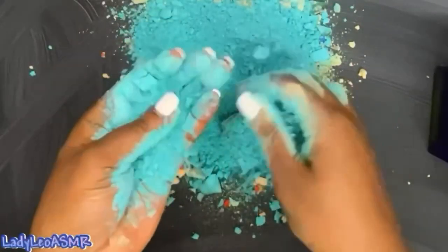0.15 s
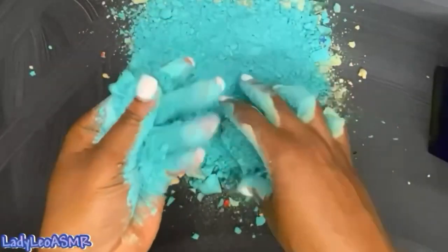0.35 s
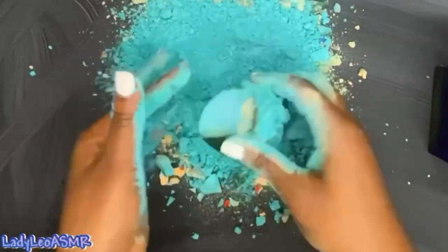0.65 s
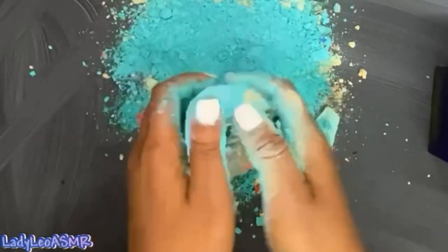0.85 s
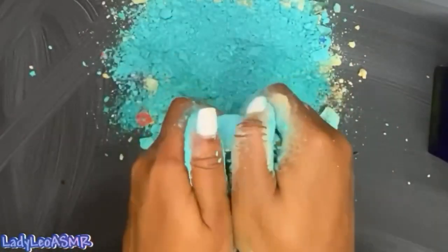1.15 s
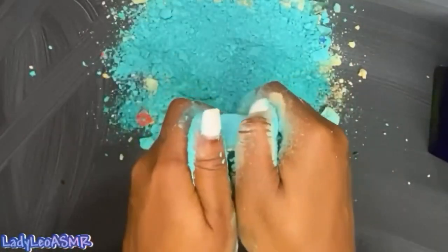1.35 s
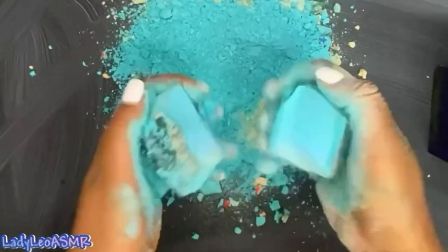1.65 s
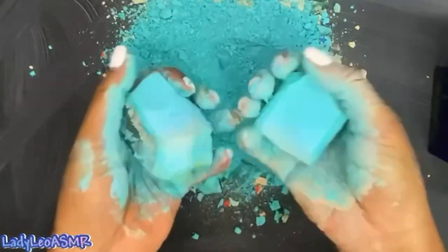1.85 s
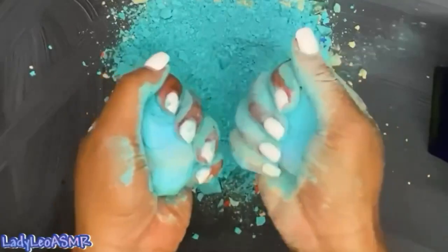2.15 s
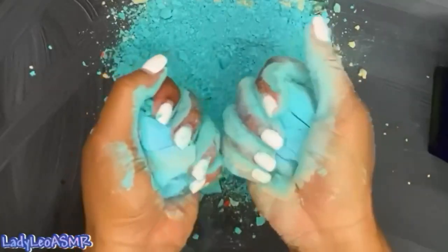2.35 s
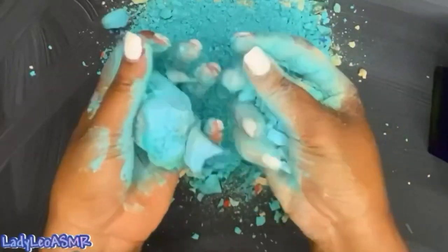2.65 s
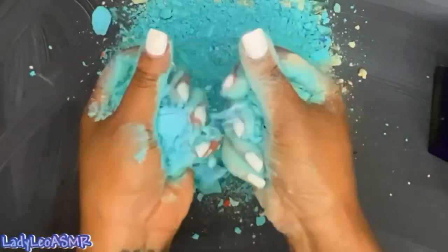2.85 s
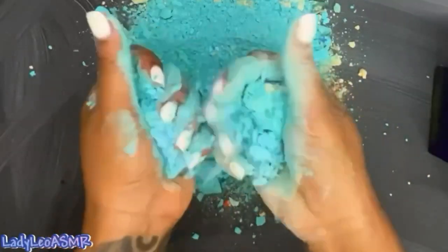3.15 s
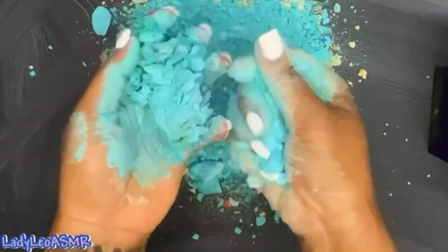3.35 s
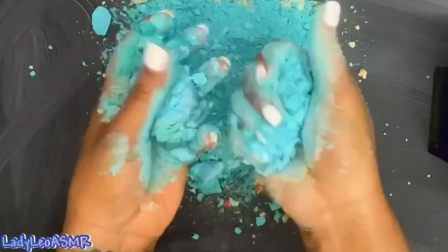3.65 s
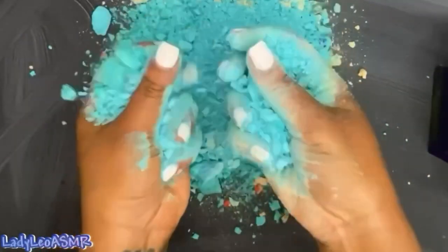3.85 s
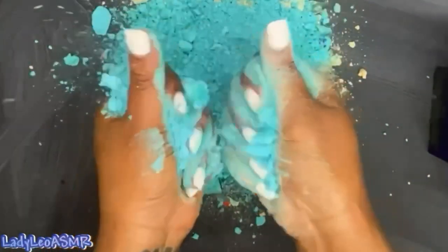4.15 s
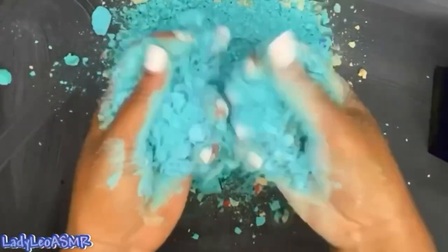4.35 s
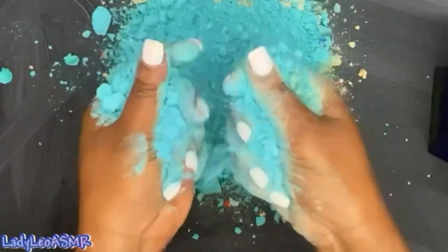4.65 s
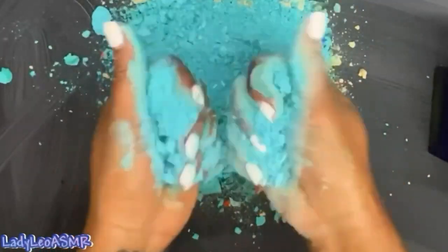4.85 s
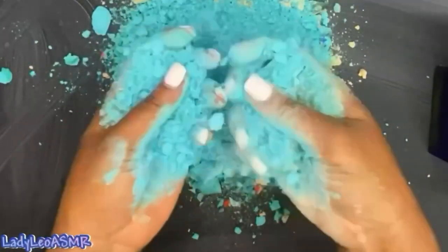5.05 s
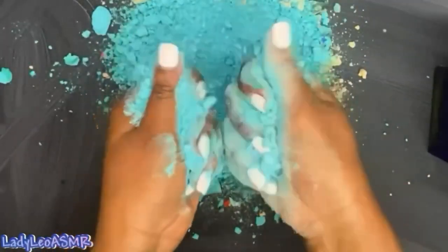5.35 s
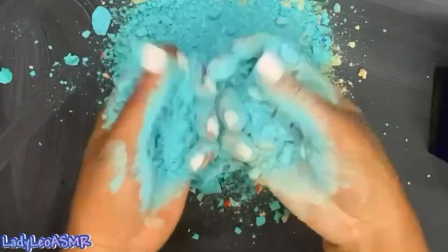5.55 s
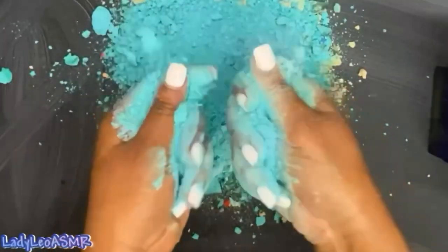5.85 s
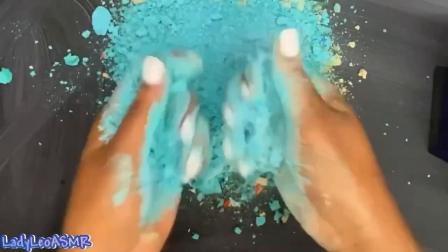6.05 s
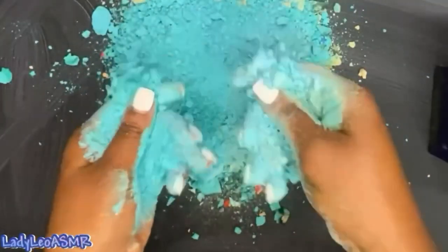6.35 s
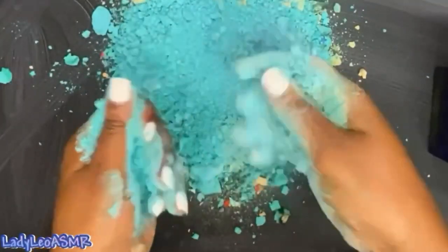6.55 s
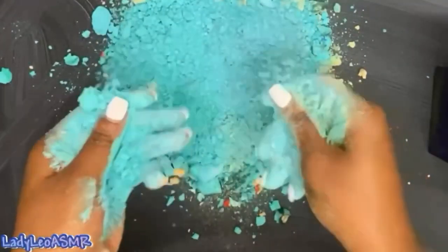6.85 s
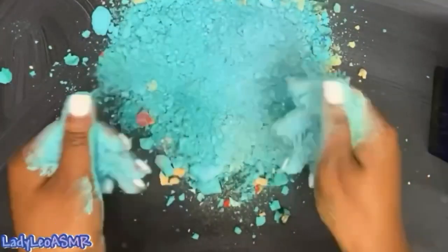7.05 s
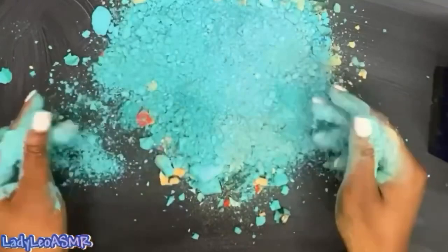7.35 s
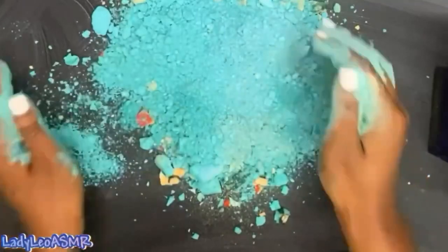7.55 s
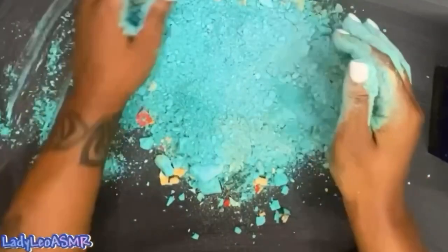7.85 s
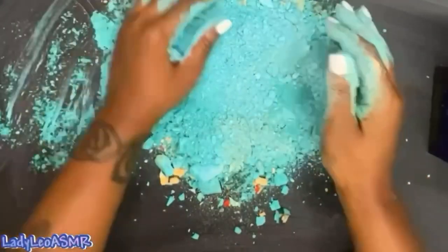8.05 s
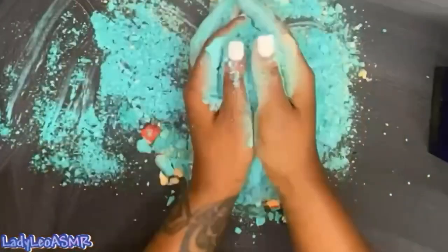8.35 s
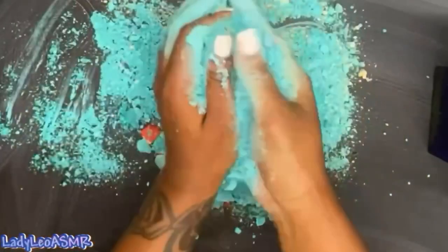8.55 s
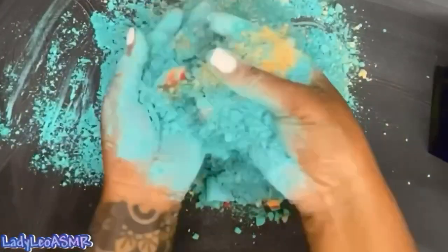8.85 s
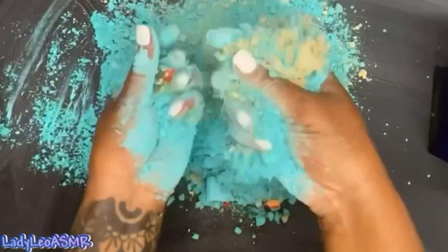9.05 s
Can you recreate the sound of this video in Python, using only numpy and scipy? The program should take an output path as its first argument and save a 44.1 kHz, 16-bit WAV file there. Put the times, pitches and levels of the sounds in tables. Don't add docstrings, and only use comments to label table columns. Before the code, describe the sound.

Close, dry chalk crushing: soft powdery rustle, a hard thump, crisp snaps and crunches, gritty kneading, then broad palm strokes scraping the heap.

```python
import sys
import numpy as np
from scipy import signal
from scipy.fft import rfft, irfft, next_fast_len
from scipy.io import wavfile
from scipy.ndimage import uniform_filter1d

SR = 44100
rng = np.random.default_rng(int(sys.argv[2]) if len(sys.argv) > 2 else 0)


def to_wav(sig):
    pcm = np.clip(np.atleast_2d(sig), -1, 1) * 32767
    pcm = np.round(pcm).astype(np.int16)
    wavfile.write(sys.argv[1], SR, pcm.T)


def gain_from_db(level_db):
    decades = np.asarray(level_db, float) / 20
    return 10 ** decades


N = 406161
OPPOSITE = np.array([[1], [-1]])


def unit(x):
    return x / np.sqrt(np.mean(x ** 2))


def ring(x, hz, width_hz):
    return signal.lfilter(*signal.iirpeak(min(hz, 0.4 * SR), hz / width_hz, fs=SR), x)


def band(x, lo_hz, hi_hz):
    return signal.sosfilt(signal.butter(3, [lo_hz, hi_hz], "band", fs=SR, output="sos"), x)


def walk(rate_hz):
    hold = int(SR / rate_hz)
    steps = np.repeat(rng.standard_normal(N // hold + 1), hold)
    return 1.84 * uniform_filter1d(steps, hold)[:N]


def bump(t, middle_s, length_s):
    return np.cos(np.pi * np.clip((t - middle_s) / length_s, -0.5, 0.5))


def add(out, start_s, sound, peak_db, pan_db):
    i = int(start_s * SR)
    sound = sound[:, :N - i] / np.abs(sound).max()
    port_db = peak_db + pan_db * OPPOSITE / 2
    out[:, i:i + sound.shape[1]] += sound * gain_from_db(port_db)


# rise in s, fall in s, after-sound in dB, its t60 in s,
# share of it that differs between the ports.
BREAK_TAILS = [
    (0.00447, 0.0118, -8, 0.52, .3),
    (0.0007, 0.0025, -11, 0.32, 1),
    (0.00073, 0.0014, -11, 0.23, 0.91),
    (0.00066, 0.0012, -11.5, 0.19, 0.55),
    (0.00043, 0.00024, -8, 0.022, 0.8),
]
FIRST_CRACK = 1.2
PATTER_DB = 2.5


def burst(noise, rise_s, fall_s, after_db, t60_s, own, clean=1):
    t = np.arange(noise.shape[1]) / SR
    swell = t ** 2 / (rise_s ** 2 + t ** 2)
    push = swell * np.exp(-t / fall_s)
    push = push / push.max()
    at_peak = np.arange(len(t)) == push.argmax()
    crack = at_peak * np.sqrt(np.sum(push ** 2)) * np.sign(noise[0, 0])
    held = noise[0, (t / (2 * fall_s)).astype(int)]
    patter = gain_from_db(PATTER_DB * np.tanh(held))
    after = gain_from_db(after_db) * swell * np.exp(-np.log(1000) * t / t60_s) * patter
    echoes = after * (noise[1] + own * noise[2] * OPPOSITE)
    return noise[0] * push + clean * FIRST_CRACK * crack + echoes


COARSE_DB = [23, 11.5, 3, -1, -2.5]
FAMILY_DB = [-12.5, -6, -3, -2, -2]
# t60 in s after letting go; coarse grains stop first, dust trickles on.
LET_GO_T60_S = [0.2, 0.39, 0.63, 0.8, 0.88]
CLOSE_S, SLIDE_IN_S = 0.0024, 0.025
BUILD_UP = 0.05


def handling(strokes, close_s):
    t = np.arange(N) / SR
    out = np.zeros((len(FAMILY_DB), N))
    t60_s = np.array(LET_GO_T60_S)[:, None]
    for start_s, hold_s, force_db, coarse in strokes:
        part = slice(int(start_s * SR), int((start_s + hold_s + t60_s.max()) * SR))
        since_s = t[part] - start_s
        grip = np.clip(since_s / (close_s + BUILD_UP * hold_s), 0, 1)
        let_go = gain_from_db(-60 * np.maximum(since_s - hold_s, 0) / t60_s)
        level_db = force_db + np.array(FAMILY_DB) + coarse * np.array(COARSE_DB)
        out[:, part] += (grip * let_go * gain_from_db(level_db)[:, None]) ** 2
    return out


# start in s, hold in s, force in dB,
# coarseness (-1 powder, +1 lumps).
SQUEEZES = [(0.0, 0.005, -51.5, 0), (0.17, 0.1, -51, -0.56), (0.45, 0.092, -57, -1),
            (0.66, 0.014, -55.5, 0), (0.7, 0.013, -69, -4), (0.8, 0.27, -68.5, -6),
            (0.98, 0.076, -56, -0.6), (1.49, 0.081, -58, 2), (1.65, 0.3, -51, -4), (1.75, 0.092, -59, -0.5),
            (1.93, 0.14, -53.5, -0.5), (2.09, 0.043, -44.5, -0.4), (2.2, 0.14, -54, 0.87),
            (2.348, 0.039, -39, .5), (2.39, 0.07, -45.5, .5), (2.45, 0.14, -46.5, .5),
            (2.6, 0.15, -45.5, 0.69), (2.685, 0.022, -38.5, 0.52), (2.75, .1, -47.5, .5),
            (2.86, 0.028, -43.5, 0.35), (2.88, 0.17, -41.5, 0.15), (3.2, 0.29, -49.5, 0),
            (3.44, 0.037, -44.5, 1.06), (3.73, 0.14, -52.5, 0.5), (3.79, 0.28, -47.5, 0.33),
            (4.21, 0.12, -41, 0.82), (4.47, 0.22, -44, 0.12), (4.64, 0.24, -45.5, 0.23),
            (5.06, .05, -54.5, .2), (5.12, 0.33, -48, 0.32), (5.47, 0.22, -71, -3), (5.655, 0.1, -53, 0),
            (5.74, 0.27, -49, 0.36), (6.08, 0.053, -51.5, 1), (6.24, 0.15, -50, 0.56),
            (6.45, 0.18, -51, 0.17), (6.7, 0.24, -55, -0.05), (6.94, 0.021, -48, 0.5),
            (6.96, .12, -84, 2.5), (7.15, 0.14, -51, -0.1), (8.73, 0.11, -52, 0), (8.85, 1, -51, 0.4),
            (8.91, 0.014, -61, -2), (4.06, 0.16, -45.5, 0.16)]
# start in s, hold in s, force in dB,
# coarseness (-1 powder, +1 lumps).
SWEEPS = [
    (7.565, 0.017, -52.5, 0.63),
    (7.655, 0.077, -37, 0.93),
    (7.73, 0.1, -32.5, 0.83),
    (7.86, 0.096, -39.5, 0.37),
    (7.94, 0.12, -41, 0.93),
    (8.06, 0.1, -41, 1.32),
    (8.17, 0.11, -38, 1),
    (8.29, 0.12, -57.5, 1.85),
    (8.44, 0.3, -47, 0.96),
]
# centre in Hz, width in Hz, grains per s, size spread in dB, trim in dB,
# share that differs between the hands.
GRAINS = [
    (153, 380, 470, -0.5, -6, 0.1),
    (480, 1230, 900, 2, 0, 1),
    (1820, 1770, 1500, 4, 2, 0.87),
    (5720, 3500, 6300, 1.5, 3, 0.37),
    (9280, 7000, 3600, -0.5, 3.5, 0.64),
]
# low and high edge in Hz, steep outside.
FAMILY_EDGES_HZ = [(60, 544), (200, 1530), (600, 4800), (2600, 9500), (5000, 15500)]
STILL_DB = [-61, -64.5, -70, -65.5, -66.5]
SWEEP_UNEVEN = 0.5


def crumbs():
    kneading = handling(SQUEEZES, CLOSE_S)
    sweeping = handling(SWEEPS, SLIDE_IN_S)
    uneven = np.where(sweeping[3] > kneading[3], SWEEP_UNEVEN, 1)
    force = np.sqrt(kneading + sweeping + gain_from_db(STILL_DB)[:, None] ** 2)
    out, grip = 0, walk(25)
    for family, level, edges_hz in zip(GRAINS, force, FAMILY_EDGES_HZ):
        hz, width_hz, rate, spread_db, trim_db, own = family
        hit = rng.random((2, N)) < rate / SR
        size_db = spread_db * uneven * np.minimum(rng.exponential(size=(2, N)), 5.0)
        grains = (hit * gain_from_db(size_db) + 0.38) * rng.standard_normal((2, N))
        both, apart = unit(band(ring(grains, hz, 0.99 * width_hz), *edges_hz))
        gain = level * gain_from_db(trim_db + uneven * (0.92 * grip + 1.72 * walk(60)))
        out = out + gain * (both + own * apart * OPPOSITE)
    return out


# centre in Hz, width in Hz, level in dB.
ROOM_MODES = [(57.9, 11.1, 0.5), (88.6, 13.2, -14), (118.7, 35, -10), (156, 119, -15.5), (41.4, 25, -10)]
# middle in s, length in s, dB over the idle level.
SWELLS = [(0.01, 0.089, 19), (0.297, 0.17, 4.5), (0.546, 0.36, 13), (0.84, 0.38, 11), (1.191, 0.2, 11.5),
          (1.496, 0.44, 7.5), (1.846, 0.32, 8.5), (2.313, 0.28, 11.5), (2.76, 0.55, 7), (3.032, 0.091, 14),
          (3.56, 0.42, 11), (4.195, 0.99, 8), (4.737, 0.67, 7.5), (5.425, 0.74, 10), (5.94, 0.24, 6.5),
          (6.205, 0.3, 6), (6.678, 0.25, 10.5), (7.047, 0.25, 10.5), (7.27, 0.38, 7.5), (7.712, 0.33, 8.5),
          (8.004, 0.34, 10.5), (8.312, 0.46, 12.5), (8.89, 1, 7)]
IDLE_DB = -40
UPPER_RUMBLE_FOLLOWS = 0.27


def rumble():
    t = np.arange(N) / SR
    load_db = IDLE_DB + sum(rise_db * bump(t, s, length_s) for s, length_s, rise_db in SWELLS)
    out = 0
    for hz, width_hz, mode_db in ROOM_MODES:
        noise = rng.standard_normal((2, N))
        both, apart = unit(ring(ring(noise, hz, width_hz), hz, 2 * width_hz))
        share = 1 if hz < 90 else UPPER_RUMBLE_FOLLOWS
        swell_db = np.mean(load_db) + share * (load_db - np.mean(load_db))
        out = out + gain_from_db(swell_db + mode_db) * (both + hz / 500 * apart * OPPOSITE)
    return band(out, 18, 300)


HISS_DB = -69.5


def air():
    both, apart = unit(band(rng.standard_normal((2, N)), 2500, 12000))
    return gain_from_db(HISS_DB) * (both + 0.6 * apart * OPPOSITE)


# start in s, ring in Hz, dull body peak in dB, crunch peak in dB.
ROLLING_KNOCKS = [(0.001, 570, -27, -37), (0.316, 563, -33, -56), (0.047, 700, -43, -63),
                  (2.355, 1100, -22, -17), (2.372, 1200, -31, -24.5), (4.705, 890, -29, -30),
                  (5.062, 490, -43, -41), (6.848, 1300, -38.5, -38), (6.868, 1300, -52, -42),
                  (7.075, 700, -39, -54.5), (7.575, 480, -35.5, -42), (7.666, 705, -30, -44),
                  (7.733, 334, -23.5, -42), (7.793, 510, -14.5, -43), (7.895, 1200, -19, -40),
                  (8.058, 860, -21.5, -33), (8.087, 480, -19, -40), (8.125, 500, -22, -40),
                  (8.269, 494, -18.5, -38), (8.296, 480, -18, -28), (8.394, 405, -30, -32),
                  (8.507, 503, -26.5, -36), (8.555, 804, -31, -40), (8.591, 400, -41, -44),
                  (8.611, 400, -31, -35), (8.677, 497, -25.5, -33), (8.752, 1300, -31, -46)]
# start in s, ring in Hz, dull body
# peak in dB, crunch peak in dB.
KNOCKS = [(0.2653, 468, -24, -56), (0.4909, 200, -36, -38), (0.705, 197, -39, -32.5),
          (1.487, 800, -9, -19), (1.737, 865, -26, -23.5), (1.8233, 660, -15.5, -17),
          (2.151, 1380, -27, -34.5), (2.191, 1160, -26, -19), (2.219, 1420, -18, -20),
          (2.2374, 1520, -13.5, -15.5), (2.2701, 1120, -17, -19), (2.3027, 965, -31, -16.5),
          (2.5868, 573, -7, -10), (2.602, 670, -23, -24), (2.652, 960, -18.5, -18.5),
          (2.6947, 560, -20, -19.5), (2.7362, 480, -11.5, -22), (2.8931, 302, -22, -16.5),
          (2.9968, 1180, -22.5, -30), (3.0262, 980, -25, -22.5), (3.057, 1350, -48, -15.5),
          (3.1127, 1180, -27, -24.5),
          (3.4762, 975, -19, -17), (3.488, 830, -28, -20), (3.5542, 202, -31, -24),
                 (3.801, 520, -25.5, -14), (3.96, 970, -29, -28.5), (3.995, 565, -10, -12.5),
                 (4.1925, 1468, -20, -19), (4.2016, 1340, -2.5, -3.5), (4.4129, 1390, -23.5, -25),
                 (4.512, 376, -30, -33), (4.5533, 493, -55, -24), (4.6429, 1320, -23.5, -22.5),
                 (4.7195, 935, -27, -32), (4.906, 990, -28, -35), (5.285, 523, -33.5, -27.5),
                 (5.3997, 988, -35, -28.5), (5.7534, 1170, -32, -27), (5.855, 1240, -19, -23.5),
                 (5.8937, 288, -24, -19.5), (6.073, 756, -18.5, -14.5), (6.264, 1380, -31, -25),
                 (6.584, 422, -25.5, -28), (6.7915, 786, -32, -39), (6.946, 790, -36, -40),
                 (7.241, 965, -39, -35), (7.2804, 730, -29.5, -58), (8.4405, 1420, -28, -25.5),
                 (8.6291, 930, -26, -24), (8.7148, 961, -27, -30), (9.0055, 1120, -33.5, -32)]
KNOCK_WIDTH = 0.45
BODY_PAN_DB, CRUNCH_PAN_DB = -1.5, -1.2


def knocks(lumps, clean=1):
    out = np.zeros((2, N))
    for s, hz, body_db, crunch_db in lumps:
        noise, pan = rng.standard_normal((2, 3, 8192)), rng.standard_normal()
        push = burst(noise[0], *BREAK_TAILS[1], clean)
        body = band(ring(push, hz, KNOCK_WIDTH * hz) + 0.47 * push, 275, 1450)
        crunch = band(burst(noise[1], *BREAK_TAILS[2], clean), 1290, 3200)
        add(out, s, body, body_db + 3.5, BODY_PAN_DB * pan)
        add(out, s, crunch, crunch_db + 5.5, CRUNCH_PAN_DB * pan)
    return out


# start in s, peak in dB, pitch in Hz.
THUMPS = [
    (1.489, -11.5, 327),
    (1.829, -21.5, 157),
    (2.903, -15.5, 161),
    (4.198, -61, 100),
    (7.965, -21, 130),
    (0.002, -35.5, 201),
]


def thumps():
    out = np.zeros((2, N))
    for s, peak_db, hz in THUMPS:
        blow = burst(rng.standard_normal((3, 8192)), *BREAK_TAILS[0], clean=0)
        add(out, s, band(blow, 0.13 * hz, 1.41 * hz), peak_db, 0)
    return out


# start in s, peak in dB, pitch in Hz.
POPS = [(0.172, -30, 3520), (0.318, -45, 710), (0.527, -26.5, 740), (2.647, -14, 2000), (3.005, -27, 1160),
        (3.882, -18, 5400), (4.036, -30, 740), (4.289, -9, 885), (4.473, -39, 956), (4.595, -18.5, 5550),
        (4.672, -17.5, 1560), (4.814, -17.5, 920), (4.935, -20, 5180), (5.438, -20.5, 1000),
        (5.463, -28, 705), (5.665, -33.5, 1800), (5.883, -18, 5000), (5.932, -17, 5300), (6.152, -21, 1170),
        (6.306, -22, 920), (6.387, -27, 1150), (6.473, -28, 1030), (6.725, -31, 1320), (6.858, -28, 3860),
        (7.166, -28, 790), (7.35, -25, 775), (8.858, -25.5, 2150), (8.92, -29, 1067), (8.968, -35, 1570),
        (9.196, -19.5, 1350)]
SPLINTER_HZ = [700, 1150, 1800, 2900, 4600, 6200]
SPLINTERS_PER_S, SPLINTER_DB, SPLINTER_SPREAD_DB = 6.6, -2, 1.5


def pops():
    out = np.zeros((2, N))
    for s, peak_db, hz in POPS:
        noise, pan = rng.standard_normal((3, 2048)), rng.standard_normal()
        push = burst(noise, 0.00033, 0.0016, -6.5, 0.15, 0.74)
        pop = ring(push, hz, 0.61 * hz) + 0.089 * band(push, 680, 10300)
        add(out, s, pop, peak_db - 0.5, 2.0 * pan)
    force = np.sqrt(handling(SQUEEZES, CLOSE_S)[2])
    decay = np.exp(-1 / (0.0017 * SR))
    for hz in SPLINTER_HZ:
        hit = rng.random(N) < SPLINTERS_PER_S / SR
        size = gain_from_db(SPLINTER_SPREAD_DB * np.minimum(rng.exponential(size=N), 3.0))
        crack = signal.lfilter([1], [1, -decay], hit * size * force) * rng.standard_normal((2, N))
        both, apart = ring(crack, hz, 0.45 * hz) * gain_from_db(SPLINTER_DB) * np.sqrt(6000 / hz)
        out = out + both + 1.6 * apart * OPPOSITE
    return out


# start in s, peak in dB, top-octave peak in dB.
SNAPS = [(0.2441, -31, -41), (0.7058, -30.5, -35), (0.904, -62, -28.5), (1.487, -19, -18.5),
         (1.499, -20, -16), (1.739, -16, -22), (1.8244, -21, -46), (2.103, -23.5, -25),
         (2.1617, -23.5, -44), (2.1905, -14.5, -13), (2.197, -14.5, -29), (2.2201, -6, -28),
         (2.238, -7, -7.5), (2.248, -16, -30), (2.271, -6.5, -11), (2.294, -20, -18),
         (2.303, -9, -21), (2.333, -18.5, -25), (2.587, -17, -19), (2.653, -22, -20),
         (2.6968, -20.5, -18.5), (2.756, -22.5, -42), (2.8947, -18.5, -17.5), (3.0002, -26, -18),
         (3.058, -12, -14.5), (3.072, -27, -34), (3.0928, -29, -22), (3.1348, -24.5, -57),
         (3.182, -30.5, -32),
         (3.436, -22.5, -29), (3.457, -18, -19), (3.467, -22, -22), (3.4772, -7.5, -7),
                (3.4873, -9, -14), (3.498, -27, -17), (3.556, -20.5, -22), (3.803, -21.5, -25),
                (3.96, -18.5, -48), (3.9995, -18, -15.5), (4.1916, -19.5, -21), (4.202, -13, -18),
                (4.227, -20, -42), (4.2492, -21, -40), (4.5356, -27.5, -53), (4.644, -23.5, -46),
                (4.78, -21.5, -28), (4.9078, -28, -29), (5.061, -30.5, -38), (5.28, -41, -51),
                (5.8562, -24, -23), (5.895, -14, -18), (6.074, -24, -27), (6.545, -29, -19),
                (6.5814, -25.5, -26), (6.7937, -29.5, -30), (8.4383, -8.5, -36), (8.676, -29, -58),
                (8.903, -35, -35), (9.0248, -34.5, -26.5)]
SNAP_PAN_DB, TOP_PAN_DB = 4.2, 2.5


def snaps():
    out = np.zeros((2, N))
    for s, peak_db, top_db in SNAPS:
        noise, (tone, pan) = rng.standard_normal((2, 3, 3500)), rng.standard_normal(2)
        tear = burst(noise[0], *BREAK_TAILS[3])
        snap = band(ring(tear, 5200 + 500 * tone, 970) + 0.61 * tear, 2750, 8930)
        top = band(burst(noise[1], *BREAK_TAILS[4], clean=0), 6100, 14500)
        add(out, s, snap, peak_db + 7.5, SNAP_PAN_DB * pan)
        add(out, s, top, top_db + 7.5, TOP_PAN_DB * pan)
    return out


# middle in s, length in s, level in dB.
DRONES = [
    (0.6, 0.35, -45),
    (5.2, 0.71, -42.5),
    (6.1, 0.78, -51),
    (7.8, 0.31, -42),
    (9.001, 0.98, -45),
]
DRONE_HZ, DRONE_WIDTH_HZ = 174.4, 23


def drone():
    t = np.arange(N) / SR
    level = sum(gain_from_db(db) * bump(t, s, length_s) for s, length_s, db in DRONES)
    hum = ring(rng.standard_normal(N), DRONE_HZ, DRONE_WIDTH_HZ)
    return level * unit(ring(hum, DRONE_HZ, DRONE_WIDTH_HZ))


# start in s, peak in dB, pitch in Hz.
SQUEAKS = [
    (0.855, -40.5, 5720),
    (0.885, -38, 5700),
    (4.975, -37.5, 5910),
    (5.274, -27.5, 5904),
]


def squeaks():
    out = np.zeros((2, N))
    for s, peak_db, hz in SQUEAKS:
        rub = rng.standard_normal(1200) * np.hanning(1200)
        note = ring(ring(np.tile(rub, (2, 1)), hz, 200), hz, 200)
        add(out, s, note, peak_db, 0)
    return out


# start in s, peak in dB, pitch in Hz.
TICKS = [(2.206, -13, 4530), (2.2555, -14, 5200), (2.278, -13, 3500), (2.358, -20, 2500),
         (2.363, -16, 3500), (2.385, -22, 2500), (2.594, -10, 1310), (2.597, -13, 2200),
         (2.8617, -29, 1250), (2.9411, -25, 3000), (2.972, -19, 1500), (4.0235, -21, 1500),
         (4.037, -16.5, 7000), (4.055, -25, 900), (4.0861, -28, 1500), (4.1493, -29, 1500),
         (4.269, -16, 2000), (4.345, -22, 1500), (8.611, -26, 3590), (8.63, -20.5, 3500),
         (8.7152, -19, 3500), (8.807, -37, 2890), (8.92, -29, 5040), (8.922, -19, 10100),
         (8.9682, -30, 4000), (9.0076, -30, 6000), (9.075, -32, 2000), (9.178, -28, 5380),
         (9.1951, -13, 9890), (2.69, -22, 2500), (2.888, -25, 2500), (2.903, -24, 2500), (2.309, -21, 9000),
         (2.283, -21, 4500), (2.347, -14, 4000), (4.01, -25, 800), (4.297, -25, 2950), (8.7153, -11, 1690),
         (4.628, -24, 2230), (4.881, -30, 1150), (5.133, -34, 912), (5.145, -31, 934), (5.175, -23, 3660),
         (5.205, -28, 861), (5.377, -33, 947), (5.695, -31, 2400), (5.726, -30, 1220), (5.797, -30, 1530),
         (5.877, -29, 1200), (6.195, -29, 1220), (6.24, -28.5, 1590), (6.362, -31, 991), (6.443, -33, 2210),
         (6.529, -29, 5110), (6.148, -29, 4500)]


def ticks():
    out = np.zeros((2, N))
    for s, peak_db, hz in TICKS:
        noise, pan = rng.standard_normal((3, 2048)), rng.standard_normal()
        click = burst(noise, 0.0004, 0.0009, -14, 0.069, 0.64)
        add(out, s, ring(click, hz, 0.51 * hz), peak_db, 2.9 * pan)
    return out


# centre in Hz, width in Hz, dB over the plain sound.
TABLE_TOP = [(294, 57, -2.5), (482, 42, -1.5), (808, 230, -10.5), (1380, 310, -18)]


def table_top(x):
    resonances = sum(gain_from_db(db) * ring(x, hz, width_hz) for hz, width_hz, db in TABLE_TOP)
    return gain_from_db(-1.5) * (x + resonances)


# frequency in Hz, radians the left port lags.
PORT_PHASE = [(100, 0), (1500, .6), (5000, .9), (6500, 1.6), (8250, 3.14), (11800, 5.9), (16000, 7.6)]
# frequency in Hz, left minus right in dB.
PORT_LEFT = [(60, 4.5), (300, 3.5), (700, 2), (1500, 0.5), (5000, 0.4)]


def ports(x):
    size = next_fast_len(N)
    log_hz = np.log(np.arange(size // 2 + 1) * SR / size + 1)
    phase_hz, phase_rad = np.transpose(PORT_PHASE)
    level_hz, level_db = np.transpose(PORT_LEFT)
    lag_rad = np.interp(log_hz, np.log(phase_hz), phase_rad)
    left_db = np.interp(log_hz, np.log(level_hz), level_db)
    half = gain_from_db(left_db / 2) * np.exp(-0.5j * lag_rad)
    return irfft(rfft(x, size) * np.array([half, 1 / half]), size)[:, :N]


def scene():
    chalk = knocks(KNOCKS) + thumps() + crumbs()
    rolling = knocks(ROLLING_KNOCKS, clean=0)
    rest = rumble() + snaps() + squeaks() + air() + pops() + drone()
    return ports(table_top(chalk + rolling) + rest + ticks())


# frequency in Hz, dB under the 5-12 kHz level.
HEARING = [(700, -40), (900, -12), (4200, -12), (4600, -40), (11000, -30), (13000, -17), (14500, -7),
           (16400, -1)]
MASK_DB = 4


def starve(x):
    frame = dict(nperseg=2048, noverlap=1024)
    hz, _, z = signal.stft([x[0] + x[1], x[0] - x[1]], SR, **frame)
    group = np.minimum(np.arange(len(hz)) // 24 * 24 + 12, len(hz) - 1)
    power = uniform_filter1d(np.abs(z) ** 2, size=24, axis=1)[:, group]
    total = power.sum(axis=0)
    settled = uniform_filter1d(power / total, size=5, axis=2) * total
    treble = power[:, (hz > 5000) & (hz < 12000)].mean(axis=(0, 1))
    sudden = treble > 2.5 * np.roll(treble, 1)
    maskable = (hz[:, None] > 6500) * ~sudden * (treble < 25 * np.median(treble))
    rival = settled[::-1] * gain_from_db(-2 * MASK_DB) * maskable
    limit_db = np.interp(hz, *np.transpose(HEARING), left=-90)
    limit = gain_from_db(2 * limit_db)[:, None] * treble * np.where(sudden, 0.08, 1)
    keep = (settled > rival) & (power > limit)
    mid, side = signal.istft(z * keep, SR, **frame)[1][:, :N]
    return np.array([mid + side, mid - side]) / 2


def top_cut(x):
    return signal.sosfilt(signal.butter(12, 16440, fs=SR, output="sos"), x)


def record(dry):
    lowpass = signal.butter(3, 14500, fs=SR, output="sos")
    dull = signal.sosfilt(lowpass, np.clip(dry, -1, 1))
    return top_cut(starve(dull))


dry = scene()
out = record(dry)
to_wav(out)
```